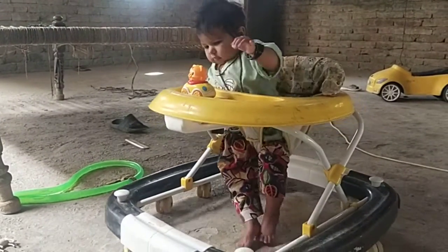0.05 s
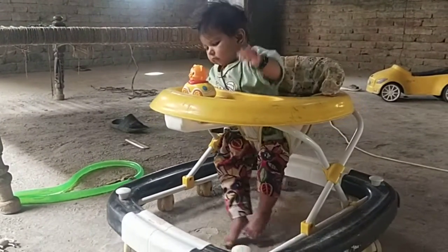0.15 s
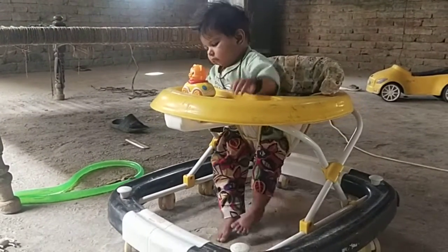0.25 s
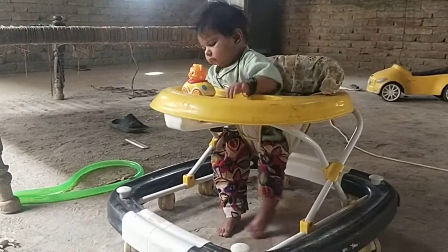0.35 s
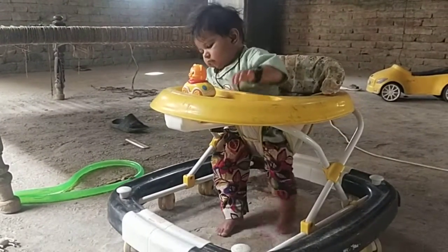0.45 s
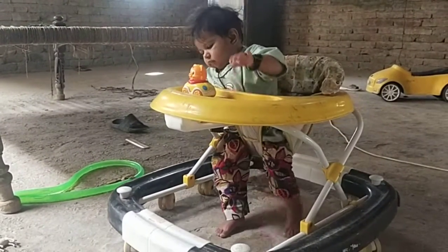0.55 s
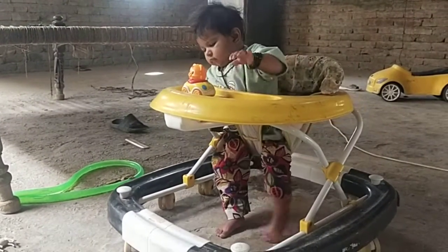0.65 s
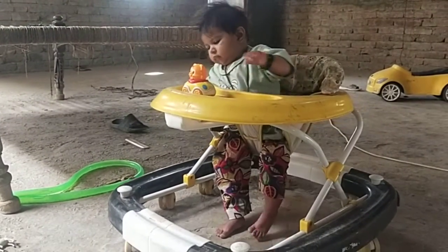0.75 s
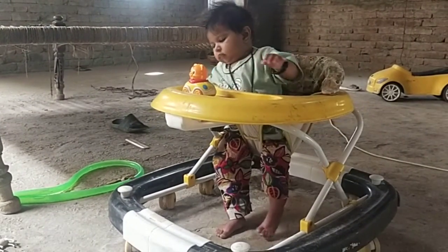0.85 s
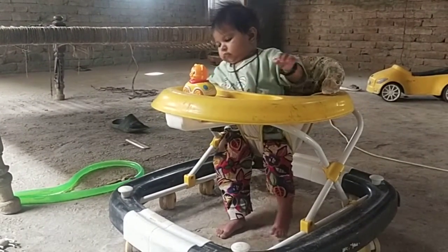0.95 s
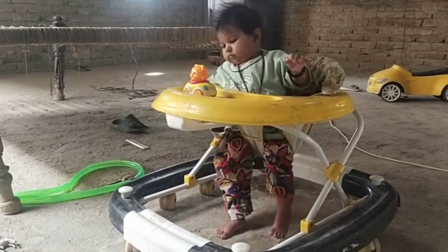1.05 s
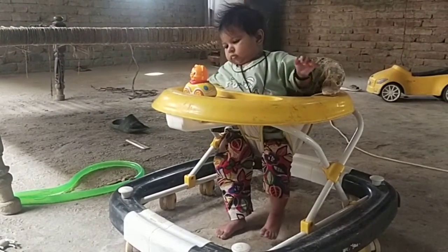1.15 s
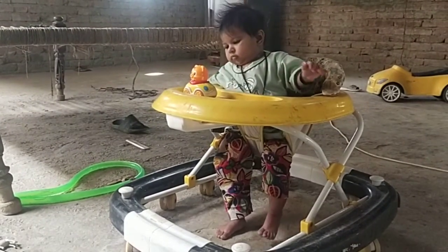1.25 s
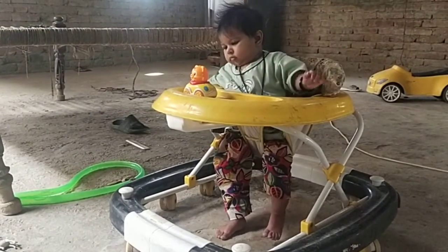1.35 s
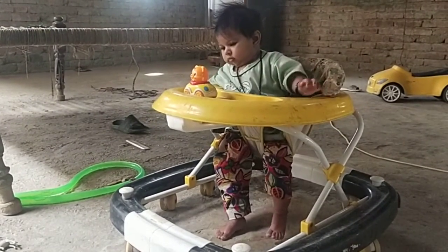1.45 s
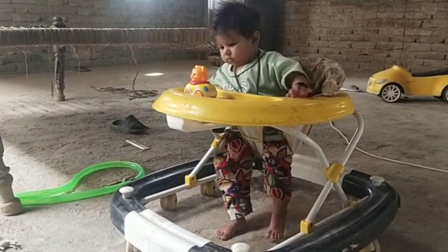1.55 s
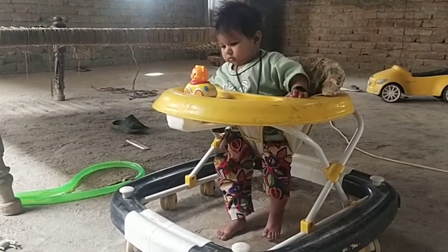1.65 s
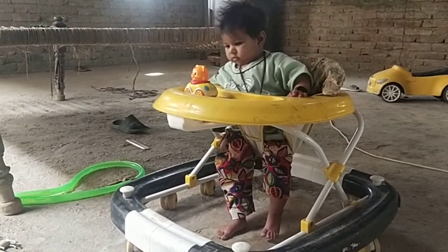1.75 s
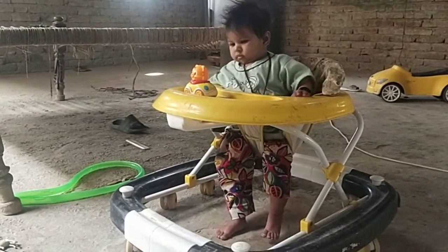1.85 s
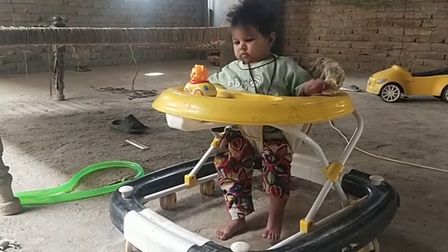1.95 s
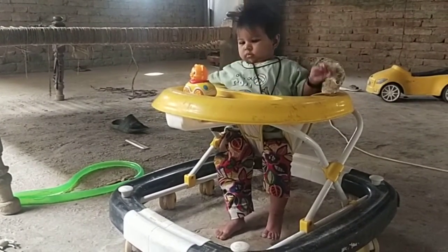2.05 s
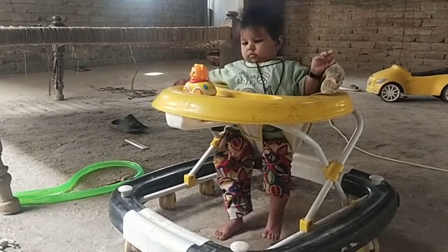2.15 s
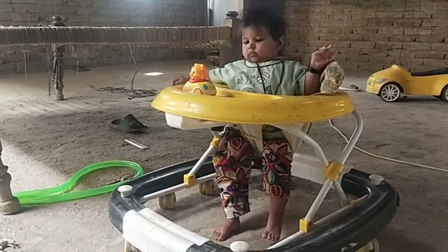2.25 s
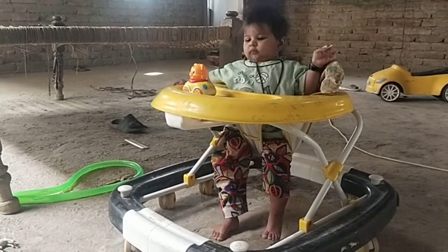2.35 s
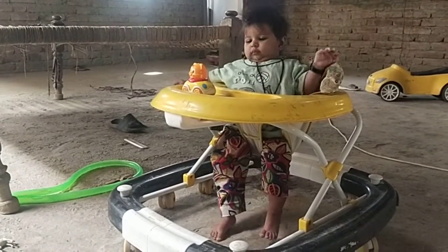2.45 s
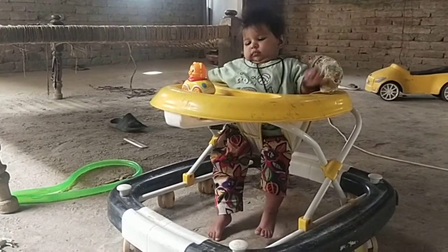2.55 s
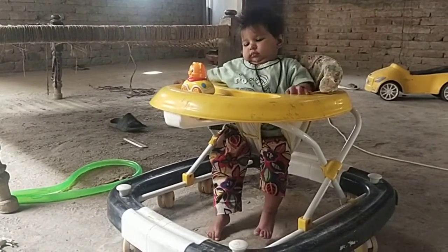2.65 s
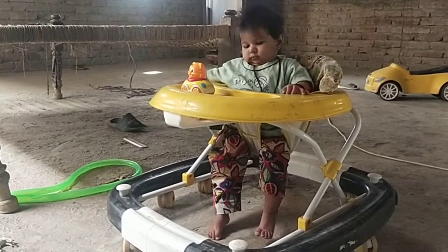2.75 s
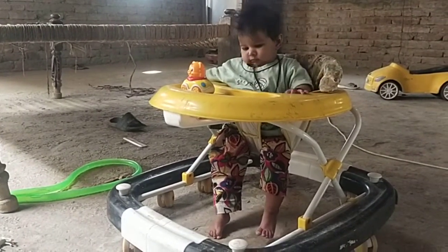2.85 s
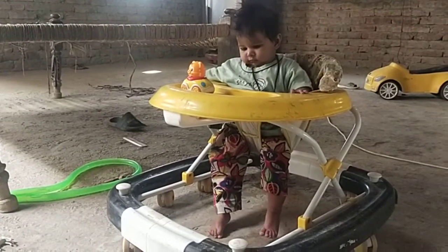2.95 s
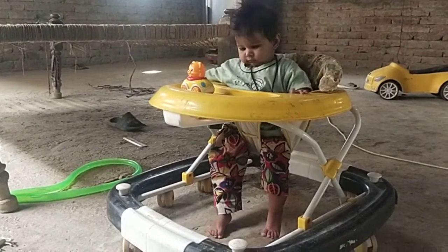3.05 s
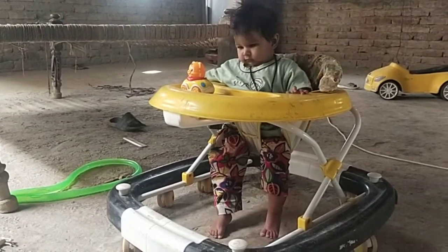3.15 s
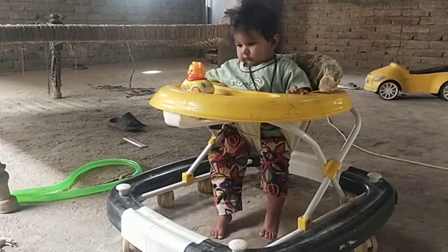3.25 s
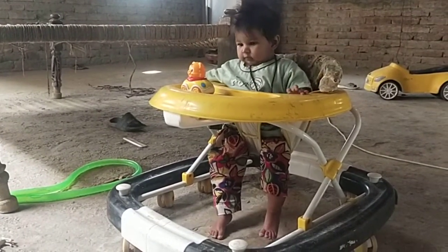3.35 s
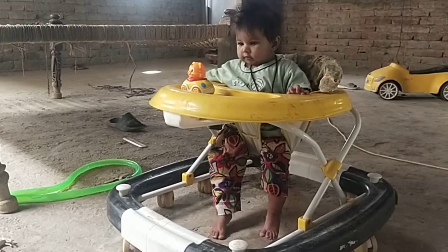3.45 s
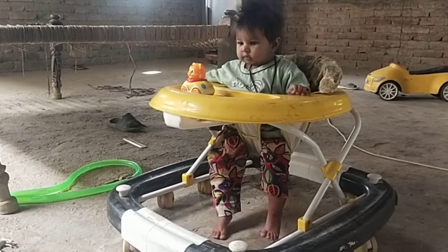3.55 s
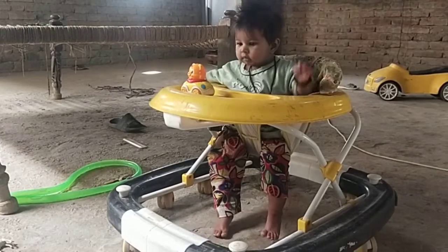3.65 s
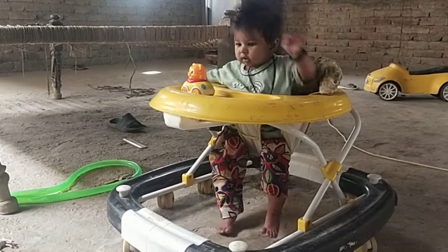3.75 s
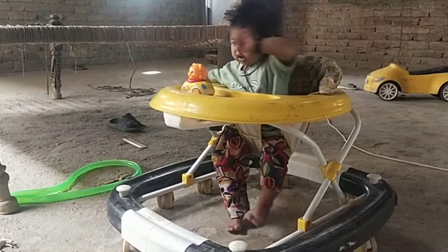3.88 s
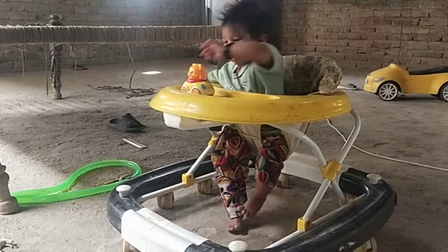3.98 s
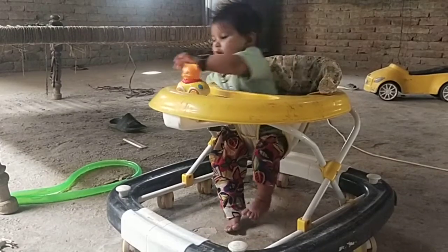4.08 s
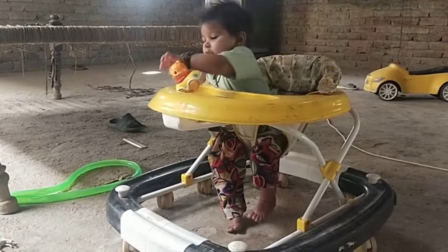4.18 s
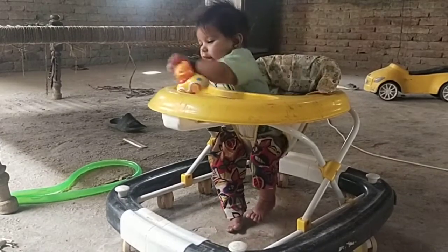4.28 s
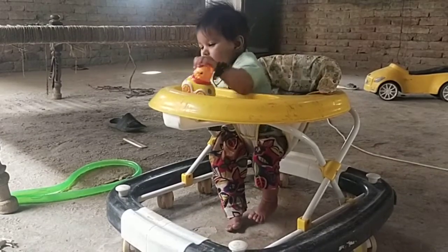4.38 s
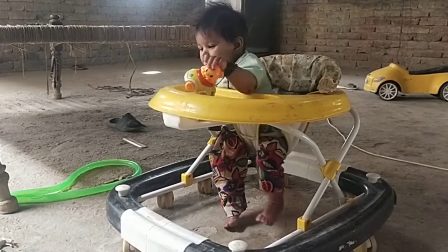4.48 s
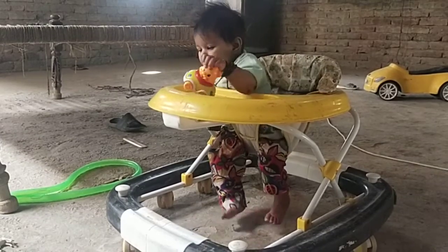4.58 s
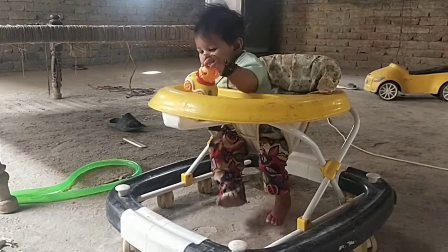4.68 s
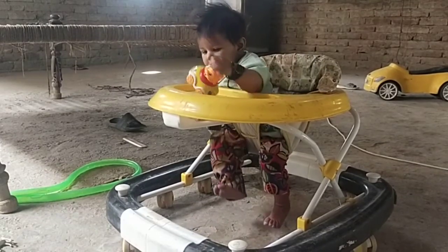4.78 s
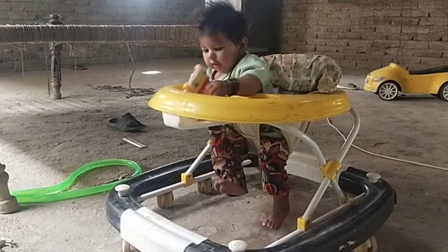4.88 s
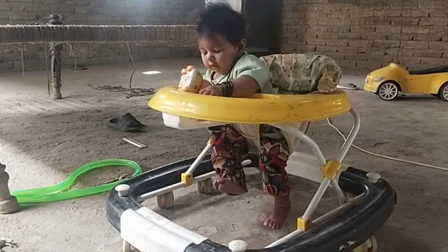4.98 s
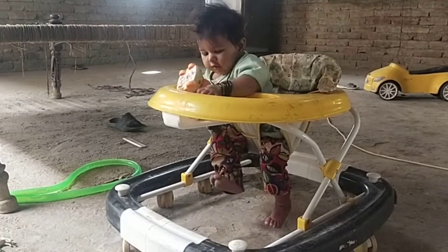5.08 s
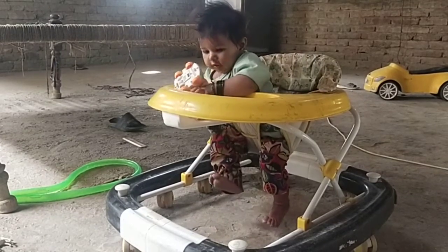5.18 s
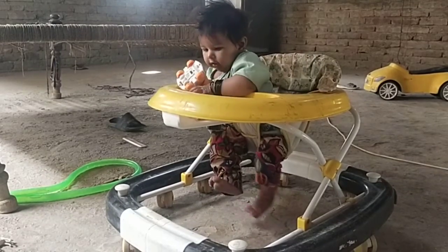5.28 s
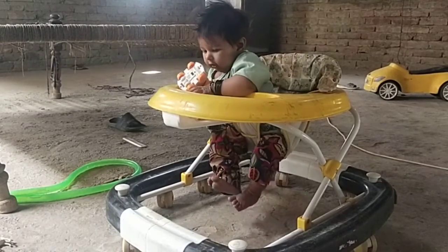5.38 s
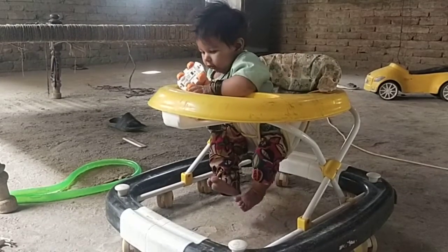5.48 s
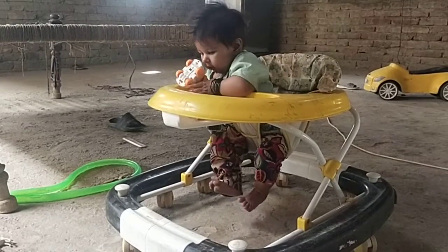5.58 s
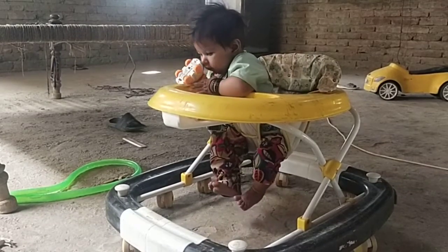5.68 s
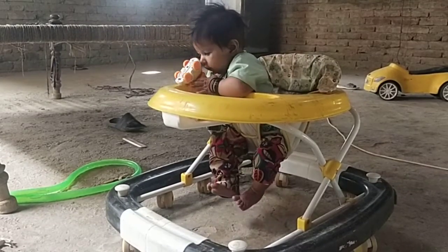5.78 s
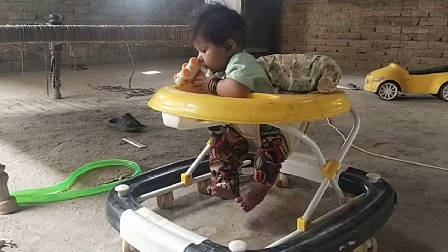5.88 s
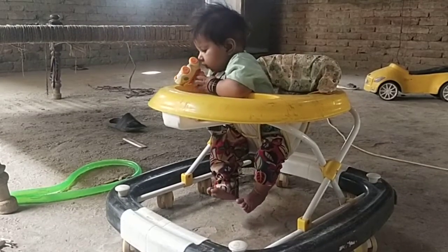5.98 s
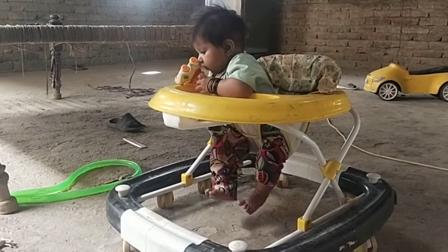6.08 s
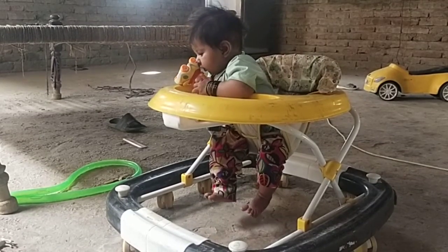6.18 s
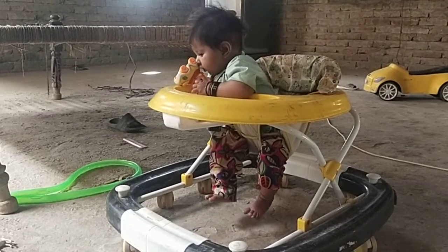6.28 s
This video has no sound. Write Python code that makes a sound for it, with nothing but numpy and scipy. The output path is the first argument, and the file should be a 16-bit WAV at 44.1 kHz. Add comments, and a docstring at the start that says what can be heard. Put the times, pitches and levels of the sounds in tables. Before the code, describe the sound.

A bare brick hall with a long echo holds a quiet, steady background of room air, fan hum and distant drones. At the start there is a soft plastic knock, a light tap and a few tiny bright ticks near the microphones, slightly left. More faint ticks come between 1 and 1.6 seconds, and again with a tap around 2.3. From about 2.4 to 3.2 seconds a small bird outside gives a faint, high, quickening trill. A faint whine passes around 3.5 to 4 seconds. From 4.2 seconds a hollow plastic toy car knocks and clatters on a hard plastic tray in irregular clusters, far louder than everything else. The strongest hits fall near 4.4, 4.9 and 5.4 seconds, with loose wheels rattling lightly from about 5 seconds. Each knock echoes through the hall. A few softer knocks follow from 5.6 to 6 seconds, leaving the hum.

```python
"""A bare brick hall with a long echo. A hollow plastic toy car knocks and rattles on a hard plastic
tray: each knock is a chatter of contacts that rings its body, its thin shell, the tray and their edges.
Faint bright ticks sound near the microphones, and a small bird trills outside. Behind it all a fan,
distant drones and two passing whines hum under the room air."""
import sys
import numpy as np
from scipy import signal
from scipy.fft import rfft, irfft, next_fast_len
from scipy.io import wavfile
from scipy.ndimage import uniform_filter1d

SR = 44100
rng = np.random.default_rng(int(sys.argv[2]) if len(sys.argv) > 2 else 0)


def log_audio(samples):
    """Write samples as a 16-bit WAV file to the path given in sys.argv[1]."""
    # one column per channel
    frames = np.atleast_2d(samples).T
    # limit to full scale, then quantise
    limited = np.clip(frames, -1, 1)
    pcm = np.round(limited * 32767).astype(np.int16)
    wavfile.write(sys.argv[1], SR, pcm)


N = 278694

# Modes of the hollow body, thin shell, tray and hard edges meeting: pitch_hz, width_hz, level_db
BODY_MODES = [(1130, 260, -11), (1390, 170, 0), (1530, 170, -1), (1970, 200, -3), (2170, 200, -4)]
SHELL_MODES = [(2832, 480, 8), (2910, 610, 3.5), (3782, 570, 2.5), (4313, 140, 2.5), (4710, 830, 0)]
TRAY_MODES = [(272, 50, -3), (335, 70, -3), (540, 70, 1), (670, 90, -2), (830, 160, -10)]
EDGE_MODES = [(6300, 3400, 11.3), (7070, 1150, 31.6), (10520, 5100, 19.7), (14950, 3100, 8.6)]
# The car hitting the tray; level_db is the shell's peak, and the next three are relative to it:
# blow_s, level_db, body_db, tray_db, edge_db, body_hz, tray_hz, shell_hz, chatter_s, echo_db
KNOCKS = [(4.155, -32, -6.5, -10.5, -9, 1600, 382, 3020, 0.0055, 7),
          (4.159, -22.5, -9, -14, -10, 1430, 530, 4470, 0.0071, -1),
          (4.177, -31.5, -19, -28, -20, 1500, 500, 2830, 0.014, 6.5),
          (4.183, -18.5, -2.5, -12.5, -7, 1450, 284, 4100, 0.012, -3.5),
          (4.285, -30.5, -1.5, -4, -10, 1490, 517, 4570, 0.0068, -2),
          (4.291, -29.5, -3.5, -4.5, -1, 1480, 285, 4730, 0.0068, -3.5),
          (4.3735, -40.5, -3, 2, -24, 1880, 400, 3800, 0.0057, 5),
          (4.396, -26.5, 4, -1, -13, 1740, 570, 3460, 0.014, -1.5),
          (4.432, -11.5, -1.5, -11, -5.5, 1540, 680, 3520, 0.014, -3),
          (4.585, -31, -19, -13, -5.5, 1700, 398, 3660, 0.0068, -6),
          (4.834, -43.5, 2.5, -6, -13, 1530, 396, 3700, 0.0069, 7),
          (4.893, -26, -8, -23, -15, 1530, 400, 3820, 0.0082, 7),
          (4.9445, -18.5, 5.5, -6, -0.5, 1900, 353, 3780, 0.005, -2),
          (4.948, -13.5, 1.5, -17.5, -8.5, 1457, 352, 3750, 0.0086, -1),
          (5.008, -33, -6, -3, -17, 2150, 510, 4300, 0.0083, 8.5),
          (5.016, -18.5, -10, -16.5, -2.5, 2090, 487, 3900, .014, -3.5),
          (5.246, -32, -1, -3, -14, 1500, 500, 3900, 0.0037, -6),
          (5.252, -27.5, -14, -17.5, -8.5, 1800, 520, 3930, 0.0088, 7),
          (5.263, -21, -1.5, -11.5, -7, 1640, 496, 4180, 0.0087, -2),
          (5.281, -28.5, -16, -11.5, -12, 2100, 530, 3820, .01, -1),
          (5.325, -29, -25, -34, -17, 1170, 395, 3220, 0.006, 5),
          (5.3435, -29.5, 6.5, -22, -7, 1390, 400, 3800, .006, 3),
          (5.347, -29, 0, -19, 2.5, 1380, 406, 4200, 0.0074, 5.5),
          (5.3545, -7.5, -13, -27, -8, 1460, 700, 3600, 0.005, -8),
          (5.371, -35, -7, -26, -13, 1810, 600, 4440, 0.011, -13),
          (5.375, -27.5, -15, -26, -7, 1500, 600, 3180, 0.0039, 4.5),
          (5.382, -34, 6.5, -21, -10, 1340, 600, 3800, 0.00775, -1.5),
          (5.4165, -25, 1.5, -11, -4, 1280, 600, 3830, .014, -8),
          (5.429, -26, -19, -21, -9, 1380, 500, 3380, .008, -14),
          (5.44, -25.5, -6, -27, -7, 1380, 500, 3800, 0.0089, -14),
          (5.449, -22.5, -19, -33, -23, 1410, 500, 3930, 0.0056, -4.5),
          (5.628, -37, -12, -27, -23, 1830, 400, 3800, 0.0061, -3),
          (5.637, -36.5, -2, -16, -22, 1390, 400, 4330, 0.0072, 1),
          (5.648, -41.5, -5, -13, -4, 1100, 400, 3800, 0.0036, 1.5),
          (5.706, -49, 0.5, -28, -7, 2290, 400, 4540, 0.0083, 7.5),
          (5.721, -41, -4, -27, -18, 1220, 397, 4540, 0.0043, -1),
          (5.868, -50, 8.5, -13, -4, 1310, 404, 3820, 0.0082, 4.5),
          (5.98, -49, -3, -23, -7, 2200, 400, 4500, 0.0073, 2)]
# A knock just before the start, its echo still in the hall: the same columns without blow_s
OPENING_KNOCK = (-28.5, 9, -4.5, -1, 2035, 700, 3990, .007, -2.5)


def toy_knocks():
    """Plastic faces close, bounce and settle; the contacts ring tray, body, shell and edges."""
    out, t = np.zeros((2, N)), np.arange(SR // 10) / SR
    softness = 1.1  # the higher, the softer a knock starts
    for (blow_s, level_db, body_db, tray_db, edge_db,
         body_hz, tray_hz, shell_hz, chatter_s, echo_db) in [(-.06, *OPENING_KNOCK), *KNOCKS]:
        progress, rise_s = t / chatter_s, chatter_s * softness / 4
        swell = progress ** softness * np.exp(-4 * progress)
        contacts = swell * rng.standard_normal(len(t)) * amp(4.1 * rng.standard_normal(len(t)))
        contacts[round(rise_s * SR)] += 0.43 * np.linalg.norm(contacts)  # the main blow
        tray = favour(TRAY_MODES, tray_hz, db_per_octave=3.4)
        body = favour(BODY_MODES, body_hz, db_per_octave=14)
        shell = favour(SHELL_MODES, shell_hz, db_per_octave=16.5)
        parts = [(tray, tray_db), (body, body_db), (shell, 0), (EDGE_MODES, edge_db)]
        direct, around = amp(level_db) * struck(contacts, parts)
        around = hollow_ring(around, [tray_hz, body_hz, shell_hz])
        add(out, blow_s - rise_s, hall(direct, around, echo_db, gap_s=.008 + rise_s))
    return out


def favour(modes, struck_hz, db_per_octave):
    """The struck spot favours modes near its pitch; no two blows ring them alike."""
    return [(hz, width, db - db_per_octave * abs(np.log2(hz / struck_hz)) + rng.normal(0, 1.5))
            for hz, width, db in modes]


# How much wider a resonance is all round than straight at the microphones: pitch_hz, width_ratio
WIDENING = [(500, 5.3), (1500, 4), (4000, 1.84)]


def struck(contacts, parts):
    """Contacts ring each (modes, peak_db) part: the direct sound, and a smoother ring sent all round."""
    n = len(contacts)
    direct, power, f = np.zeros(n), 0, np.fft.rfftfreq(n, 1 / SR)
    for k, (modes, peak_db) in enumerate(parts):
        ring = amp(peak_db) * resonant(contacts, modes)
        direct += (-1) ** k * ring
        shape = 0
        for hz, width, db in modes:  # all round, the modes add as powers
            detuning = (hz * hz - f * f) / (f * width * along(WIDENING, hz) + 1e-9)
            shape += (amp(db) / (1 + detuning ** 2)) ** 2
        power += shape / shape.mean() * np.sum(ring ** 2)
    around = np.roll(irfft(np.sqrt(power), n), round(.003 * SR))
    return np.array([direct, around])


# Hollow spaces that ring on after a blow: pitch_hz, width_hz, gain_db
HOLLOWS = [(275, 35, 9), (345, 45, 9), (540, 35, 12), (665, 45, 12), (815, 35, 9), (1380, 50, 11),
           (1510, 55, 12), (1620, 45, 8), (2050, 55, 10), (2135, 45, 10), (2700, 45, 11), (3290, 45, 8),
           (3730, 60, 12), (3990, 70, 9)]


def hollow_ring(around, struck_hz):
    """The hollows nearest the struck pitches ring on; the total energy stays the same."""
    modes = []
    for hz, width, db in HOLLOWS:
        octaves_off = np.abs(np.log2(hz / np.array(struck_hz))).min()
        modes.append((hz, width, amp(db - 17 * octaves_off + rng.normal(0, 1.5))))
    rung = filtered(around, lambda f: 4 + sum(gain * resonance(f, hz, w) for hz, w, gain in modes))
    return rung * np.linalg.norm(around) / np.linalg.norm(rung)


# Light taps on the toy's body: start_s, peak_db, pitch_hz
TAPS = [(0.2178, -38, 1950), (2.2682, -44, 1450), (2.6592, -51, 1480)]


def toy_taps():
    """A short, dull burst of contact rings one mode of the body."""
    out, t = np.zeros((2, N)), np.arange(SR // 10) / SR
    for start_s, peak_db, hz in TAPS:
        contacts = t * amp(-60 * t / 0.029) * uniform_filter1d(rng.standard_normal(len(t)), size=10)
        direct, around = struck(contacts, [([(hz, 130, 0)], peak_db)])
        add(out, start_s, hall(direct, around, echo_db=0, gap_s=0.0054))
    return out


# Spells of loose wheels shaking: start_s, end_s, shell_rms_db
RATTLES = [(4.961, 5.107, -45), (5.27, 5.334, -56), (5.365, 5.482, -62)]


def wheel_rattle():
    """Wheels and axles jostle after the blows: scattered small contacts ring shell, body and edges."""
    out, jolts_per_s = np.zeros((2, N)), 280
    for start_s, end_s, shell_db in RATTLES:
        n = round((end_s - start_s) * SR)
        jolts = (rng.random(n) < jolts_per_s / SR) * rng.standard_normal(n)
        jolts *= amp(4 * rng.standard_normal(n)) * np.linspace(1, .5, n)
        jolts = np.pad(jolts, (0, 2000)) + 1e-9
        shaken = sum(amp(shell_db + db) * unit(resonant(jolts, modes))
                     for modes, db in [(SHELL_MODES, 0), (BODY_MODES, 3), (EDGE_MODES, -14)])
        add(out, start_s, hall(shaken, shaken, echo_db=-5.5, gap_s=.008))
    return out


# Single ticks near the microphones; the low and high rings are relative to the middle one:
# start_s, middle_peak_db, low_db, high_db, middle_hz
TICKS = [(0.02, -53.5, 11, 9.5, 7360), (0.1, -45, -18, 1, 7300), (0.172, -41, -2, 0, 6900),
         (0.2214, -58, 13, -3, 7400), (0.2893, -49.5, 3, -2, 7160), (1.0727, -52.5, 3, 3, 7300),
         (1.1585, -54, 9, 8, 7340), (1.5572, -52.5, 12, -5, 7400), (2.2683, -58, -11.5, 6, 7400),
         (2.2825, -55, -15, -7, 7900), (2.2905, -42, 2, -5, 7700), (2.2953, -36.5, -13, -9, 7300),
         (2.3013, -49, -5, -11, 7800), (2.3063, -52, -13, -12, 7800)]
# Quick runs of ticks: start_s, count, first_peak_db
TICK_RUNS = [(0.997, 2, -57), (1.2795, 7, -53.5), (1.467, 3, -54)]


def nearby_ticks():
    """Tiny hard clicks, single or in fading runs, ring briefly in three treble regions."""
    out, t = np.zeros((2, N)), np.arange(800) / SR
    spacing_s, jitter_s, fade_db, left_lead_s = .0165, .0007, 0.5, .00007
    runs = [(start_s + k * spacing_s + rng.normal(0, jitter_s), db - fade_db * k, -3, 1, 6800)
            for start_s, count, db in TICK_RUNS for k in range(count)]
    for k, (start_s, peak_db, low_db, high_db, hz) in enumerate([*TICKS, *runs]):
        single = k < len(TICKS)
        snap = t * amp(-60 * t / (.003 if single else .009)) * rng.standard_normal(len(t))
        if single:  # a sharp edge; ticks in a run only drag
            snap[30] += np.linalg.norm(snap)
        parts = [([(4800, 4200, 0)], low_db), ([(hz, 2000, 0)], 0), ([(11200, 3800, 0)], high_db)]
        direct, around = amp(peak_db) * struck(snap, parts)
        add(out, start_s, hall(direct, around, echo_db=-5, gap_s=.004))
    out[0] = np.roll(out[0], -round(left_lead_s * SR))  # further left than the toy
    return out


def bird_trill():
    """Outside, nine whistled notes quicken, swell and grow clearer; each arches up and drops away."""
    out = np.zeros((2, N))
    start_s, spacing_s, first_note_s, first_db, swell_db = 2.426, .096, .042, -69.5, 1.3
    for k in range(9):
        progress = np.linspace(0, 1, round(first_note_s * (1 - .035 * k) * SR))
        top_hz = 6280 - 19 * (k - 3) ** 2  # the fourth note is the highest
        pitch_hz = top_hz * (1 - (.8 - .05 * k) * (progress - .45) ** 2)
        blur = 1 + (1.5 - .16 * k) * unit(uniform_filter1d(rng.standard_normal(len(progress)), size=80))
        envelope = amp(first_db + swell_db * k) * np.abs(np.sin(np.pi * progress)) ** 0.18
        note = envelope * blur * np.sin(2 * np.pi * np.cumsum(pitch_hz) / SR)
        add(out, start_s + k * (spacing_s - .0007 * k), hall(note, note, echo_db=-1.3, gap_s=0.028))
    return out


# The fan's partials, one list for each motor tone: offset_turns, rms_db
FAN_PARTIALS = ([(0, -66)], [(-1, -79), (0, -66), (1, -74), (2, -68), (3, -76), (4, -77)], [(-1, -81),
                (0, -63.5), (1, -73), (2, -80)], [(0, -74)])


def fan():
    """Four motor tones, with side tones at whole multiples of the turning rate away."""
    out, t = np.zeros(N), np.arange(N) / SR
    motor_hz, turn_hz = (95.6, 823.6, 893.6, 982.5), 4.92
    for hz, partials in zip(motor_hz, FAN_PARTIALS):
        phase = rng.random()
        for turns, db in partials:
            # quarter-cycle offsets make the pitch wobble rather than the level
            cycles = (hz + turns * turn_hz) * t + phase + turns ** 2 / 4
            out += np.sqrt(2) * amp(db) * np.sin(2 * np.pi * cycles)
    return out


# Faint whines that come and go: start_s, end_s, pitch_hz, width_hz, rms_db
WHINES = [(1.0, 2.1, 5040, 150, -84), (3.548, 4.15, 2300, 80, -65)]


def whines():
    """Narrow bands of noise fade in and out."""
    out = np.zeros((2, N))
    for start_s, end_s, hz, width, db in WHINES:
        n = round((end_s - start_s) * SR)
        add(out, start_s, amp(db) * unit(noise_band(n, hz, width)) * np.sqrt(np.hanning(n)))
    return out


# Drones far from the microphones: pitch_hz, width_hz, rms_db
DRONES = [(86.6, 2.9, -75.5), (92.6, 20, -70.5), (220.6, 3.7, -66), (271, 4.6, -74), (334.4, 151, -59),
          (897, 420, -64), (2214, 220, -70), (7200, 770, -81.5)]


def distant_drones():
    """Bands of noise hum throughout; the narrow ones waver slowly."""
    return sum(amp(db) * unit(spread(noise_band(N, hz, width), [(hz, 0)])) for hz, width, db in DRONES)


# Spectrum of the air in the hall: pitch_hz, relative_db
AIR_TONE = [(25, -71), (45, -11.5), (80, -17), (150, -4.5), (300, -11.5), (450, -8.5), (900, -6.5),
            (1300, -12), (2600, -12), (4500, -23.5), (7500, -33), (9000, -37), (16000, -41)]


def room_air():
    """A soft rush whose level varies in faint patches of time and pitch."""
    rms_db, patch_db = -55.5, 1.3
    spectra = signal.stft(rng.standard_normal((2, N)), nperseg=512)[2]
    patches = uniform_filter1d(rng.standard_normal(spectra.shape[1:]), 5, axis=0)
    patches = unit(uniform_filter1d(patches, 10, axis=1))
    rush = signal.istft(spectra * amp(patch_db * patches), nperseg=512)[1][:, :N]
    return amp(rms_db) * unit(spread(rush, AIR_TONE))


# Time the brick hall takes to die away by 60 dB: pitch_hz, decay_s
HALL_DECAY = [(250, 0.92), (1000, 0.87), (4000, 0.78), (8000, 0.56), (15000, 0.41)]
# Colour of its echo: pitch_hz, gain_db
HALL_TONE = [(170, -21), (270, 7.5), (450, 3), (900, 5.5), (1450, -2.5), (2400, 0.5), (4000, -3.5),
             (5500, -0.5), (12000, 0.5)]


def hall(direct, around, echo_db, gap_s):
    """The direct sound arrives first; what went all round returns as a diffuse tail, treble dying first."""
    hz, t, spectra = signal.stft(rng.standard_normal((2, 3 * SR // 4)), SR, nperseg=256)
    tail = signal.istft(spectra * amp(-60 * t / along(HALL_DECAY, hz)[:, None]), SR, nperseg=256)[1]
    tail = spread(tail / np.linalg.norm(tail[0]), HALL_TONE)
    delayed = np.pad(around, (round(gap_s * SR), 0))
    heard = signal.fftconvolve(delayed[None], amp(echo_db) * tail, axes=1)
    heard[:, :len(direct)] += direct
    return heard


# How alike diffuse sound is at the two microphones: pitch_hz, correlation
LIKENESS = [(60, 0.9), (250, 0.99), (450, 0.85), (800, 0.55), (1300, 0.12), (2200, 0.031)]


def spread(pair, tone):
    """Two unrelated signals, coloured by tone and mixed to left and right, alike in the bass."""
    def mid_and_side(hz):
        angle = np.arccos(along(LIKENESS, hz)) / 2
        return amp(along(tone, hz)) * [np.cos(angle), np.sin(angle)]
    mid, side = filtered(pair, mid_and_side)
    return np.array([mid + side, mid - side])


def resonance(f, hz, width):
    """Complex response of one damped mode."""
    return 1j * f * width / (hz * hz - f * f + 1j * f * width)


def resonant(x, modes, steep_hz=2400):
    """x through damped modes, peak 1; low ones speak at once, high ones are steep-sided."""
    ring = filtered(x, lambda f: sum((-1) ** k * amp(db) * resonance(f, hz, w) ** (1 + (hz > steep_hz))
                                     for k, (hz, w, db) in enumerate(modes)))
    return ring / np.abs(ring).max()


def noise_band(n, hz, width):
    """Two unrelated noises in a bell-shaped band."""
    return filtered(rng.standard_normal((2, n)), lambda f: np.exp(-2 * ((f - hz) / width) ** 2))


def filtered(x, response):
    """x times a complex response of frequency."""
    size = next_fast_len(x.shape[-1] + 4096)
    return irfft(rfft(x, size) * response(np.fft.rfftfreq(size, 1 / SR)), size)[..., :x.shape[-1]]


def along(points, hz):
    """Interpolates (pitch_hz, value) points on a log axis."""
    pitches, values = np.transpose(points)
    return np.interp(np.log(hz + 1), np.log(pitches + 1), values)


def amp(db):
    return 10 ** (np.asarray(db) / 20)


def unit(x):
    return x / np.sqrt(np.mean(x ** 2) + 1e-20)


def add(out, start_s, x):
    """Mixes x in at start_s, trimmed to the scene."""
    i = round(start_s * SR)
    part = x[:, max(-i, 0):N - i]
    out[:, max(i, 0):max(i, 0) + part.shape[1]] += part


def scene():
    """The toy, the ticks and the bird over the hall's background."""
    toy = toy_knocks() + toy_taps() + wheel_rattle()
    return toy + nearby_ticks() + bird_trill() + room_air() + distant_drones() + whines() + fan()


# Left microphone's level over the right: pitch_hz, gain_db
LEFT_GAIN = [(300, -0.5), (1200, 1), (2500, 3.5), (4000, 9.5), (5300, 11), (6800, -2), (8500, -0.5),
             (12000, 3)]
# The left microphone hears late, most in the treble: pitch_hz, lag_s
LEFT_LAG = [(250, .00006), (900, .00013), (1400, .00012), (1750, .00032), (2200, .00044), (2900, .00037),
            (3600, .00032)]


def record(dry):
    """Two microphones differ in colour and timing, half each way; nothing stays above 16 kHz."""
    def microphones(hz):
        left = amp(along(LEFT_GAIN, hz) / 2) * np.exp(-1j * np.pi * hz * along(LEFT_LAG, hz))
        return np.array([left, 1 / left]) * (hz < 16000)
    return filtered(dry, microphones)


dry = scene()
out = record(dry)
log_audio(out)
```